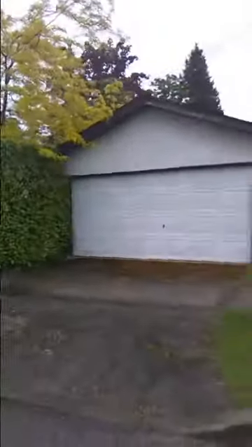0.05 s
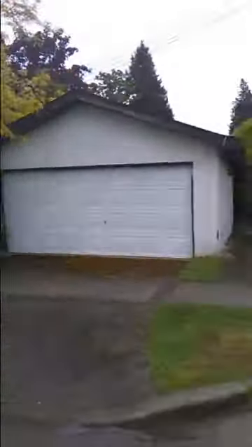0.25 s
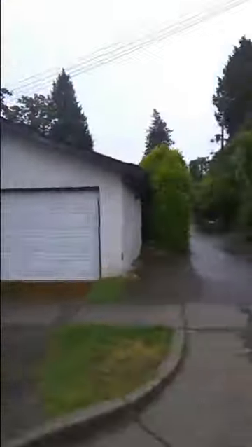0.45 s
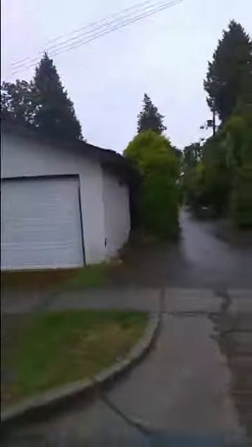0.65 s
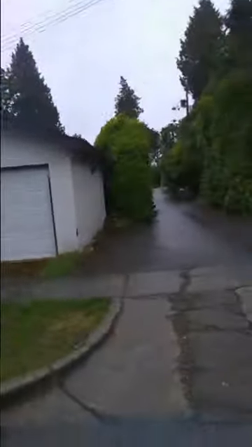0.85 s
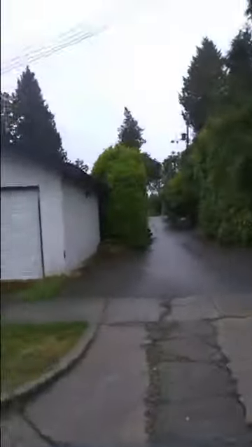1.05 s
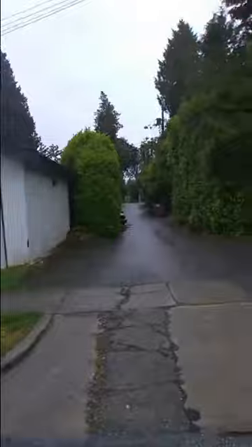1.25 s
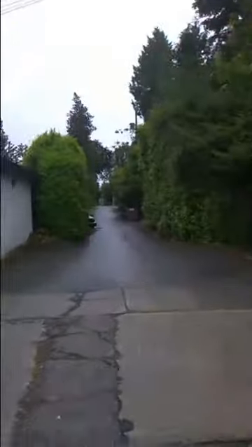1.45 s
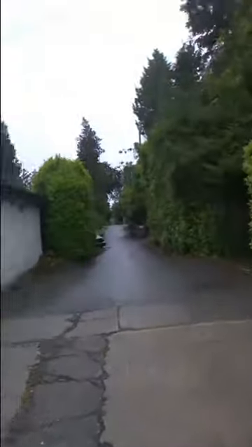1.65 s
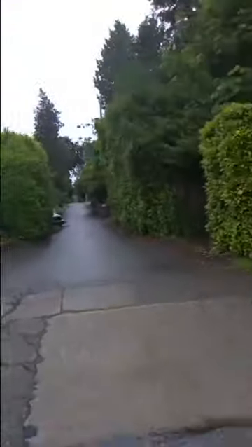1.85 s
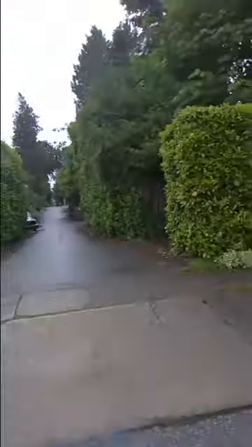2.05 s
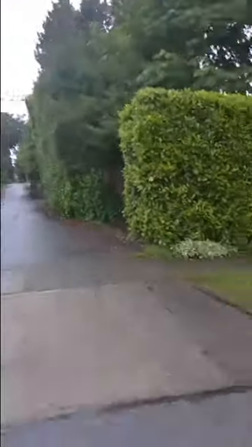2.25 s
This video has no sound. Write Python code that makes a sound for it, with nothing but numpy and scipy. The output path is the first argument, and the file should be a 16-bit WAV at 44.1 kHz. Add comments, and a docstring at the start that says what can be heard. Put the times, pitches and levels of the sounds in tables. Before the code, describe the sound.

Gusts of wind hit the microphone with uneven low thumps, ease off, then return more briefly. Beneath them, soft footsteps scuff and fizz on wet outdoor pavement, and very faint distant traffic swells near the end.

```python
"""A hand-held camera moves along a damp lane. Over quiet outdoor air come short wet scuffs, probably
soles on the pavement, each a snap and a fizz of spray, with ticks of grit between them. From 0.2 to
0.9 s turbulent gusts buffet the two microphone ports, the left one hard enough to overload.
After a lull the scuffs return and far traffic swells; more gusts peak near 1.8 s, and two last
scuffs sound as the wind dies away."""
import sys
import numpy as np
from scipy import signal
from scipy.fft import rfft, irfft, next_fast_len
from scipy.io import wavfile
from scipy.ndimage import uniform_filter1d

SR = 44100
rng = np.random.default_rng(int(sys.argv[2]) if len(sys.argv) > 2 else 0)


def materialize(psi):
    """Save the field psi as 16-bit PCM at rate SR to the path in sys.argv[1].

    A 1-D psi becomes a single channel; in a 2-D psi each row is a channel.
    """
    bounded = np.clip(np.atleast_2d(psi).T, -1, 1)
    quanta = np.round(bounded * 32767).astype(np.int16)
    wavfile.write(sys.argv[1], SR, quanta)


N = 101429
TIME = np.arange(N) / SR

# Bright spectrum of snapping grit: frequency_hz, gain_db
GRIT_SPECTRUM = [(2000, -22.5), (4500, -30), (6500, 4), (7600, -4), (8800, 7.5), (10500, -9),
                 (14000, -11.5), (16000, -48)]
GRIT_RISE = 0.29  # rise time as a share of the fall time


def amp(db):
    """Amplitude grows tenfold for every 20 dB."""
    return 10 ** (np.asarray(db) / 20)


def unit_rms(x):
    """Normalisation to unit mean power."""
    return x / np.sqrt(np.mean(x ** 2) + 1e-20)


def ports(pan_db):
    """A level difference between the ports gives direction; positive is left."""
    return amp([[pan_db / 2], [-pan_db / 2]])


def coloured(x, spectrum, ratio=1):
    """Spectral shaping: x is filtered by a curve transposed by ratio, then set to rms 1."""
    hz, db = np.transpose(spectrum)
    length = x.shape[-1]
    size = next_fast_len(length)
    bins_hz = np.fft.rfftfreq(size, 1 / SR)
    gain = amp(np.interp(np.log(bins_hz + 1), np.log(hz * ratio + 1), db))
    return unit_rms(irfft(rfft(x, size) * gain, size)[..., :length])


def noise(spectrum, correlation, ratio=1, grain_db=0., count=N):
    """Partly coherent stereo noise; uneven grains roughen it, and it repeats after count samples."""
    left, independent = rng.standard_normal((2, count))
    right = correlation * left + np.sqrt(1 - correlation ** 2) * independent
    grains = amp(grain_db * np.minimum(rng.exponential(1, count), 5))
    stretch = coloured(np.array([left, right]) * grains, spectrum, ratio)
    return np.tile(stretch, N // count + 1)[:, :N]


def burst(peak_s, rise_s, fall_s):
    """Envelope of a transient: Gaussian rise, exponential decay."""
    t = TIME - peak_s
    return np.exp(-np.minimum(np.where(t < 0, (t / rise_s) ** 2, t / fall_s), 60))


def background():
    """Incoherent sources add in power: distant tyre noise swells over a steady ambient floor."""
    # Traffic swell: time_s, level_db
    swell = [(0, -66.5), (.9, -68), (1.1, -66.5), (1.25, -60), (1.7, -55), (1.95, -51.5), (2.1, -51.5),
             (2.3, -54.5)]
    # Spectra of tyres and outdoor air: frequency_hz, gain_db
    tyre_spectrum = [(100, 7), (300, -11), (600, 0), (900, 3), (1250, 4), (1600, -1.5), (2100, -13),
                     (3500, -15.5), (6000, -31), (12000, -37)]
    air_spectrum = [(30, -11), (80, 10), (250, 10), (600, 3.5), (1400, 0.5), (2400, 3.5), (4500, -5.5),
                    (8500, -2.5), (11000, -11), (15000, -22)]
    traffic = amp(np.interp(TIME, *np.transpose(swell))) * noise(tyre_spectrum, correlation=0.68)
    air = amp(-68.5) * noise(air_spectrum, correlation=0.1)
    return ports(pan_db=2) * traffic + ports(pan_db=1) * air


def ticks():
    """A brief impulse has a broad spectrum: single grains of grit snap, mostly on the left."""
    # Snaps: peak_s, level_db
    snaps = [(.113, -47), (0.211, -62), (.482, -65), (0.594, -61.5), (.617, -61), (0.628, -63),
             (0.904, -65), (1.421, -67), (1.561, -58), (1.687, -58), (1.719, -55), (1.801, -52.5)]
    fall_s = 0.0012
    envelope = sum(amp(db) * burst(at, GRIT_RISE * fall_s, fall_s) for at, db in snaps)
    return ports(pan_db=13) * noise(GRIT_SPECTRUM, correlation=0.2) * envelope


def sprays():
    """Many fine droplets merge into a hiss, after the scuffs and faintly between them."""
    # Showers of droplets: peak_s, level_db, rise_s, fall_s, pan_db, pitch_ratio
    showers = [(.082, -46.5, 0.025, 0.038, 3, 0.99), (.13, -54.5, 0.017, 0.028, 7.5, 1.07),
               (.252, -64, .004, 0.025, -10, 0.75), (0.316, -56.5, 0.024, 0.045, 6, 0.9),
               (.56, -68.5, .015, .03, 10, 1), (.63, -65, 0.018, 0.073, 7, 0.82),
               (1.177, -50.5, 0.032, 0.04, 3.5, 0.94), (1.361, -61, 0.031, 0.12, 2, 0.68),
               (1.425, -63, 0.023, 0.027, 3, 0.86), (1.55, -46.5, 0.021, 0.044, 4.5, 0.98),
               (1.688, -62, 0.027, 0.017, 21, 1.27), (1.73, -61, 0.15, 0.073, -6, 0.81),
               (1.94, -67, 0.036, 0.063, -14, 0.82), (2.171, -54.5, 0.075, 0.063, -7, 0.92),
               (2.249, -45.5, 0.067, 0.052, -0.5, 0.96)]
    # Droplet spectrum: frequency_hz, gain_db
    spectrum = [(1500, -21), (2700, -11.5), (4500, -10), (5400, -4.5), (7000, -4), (8700, 5), (10200, -3.5),
                (14000, -22), (16000, -40)]
    out = np.zeros((2, N))
    for at, db, rise_s, fall_s, pan_db, ratio in showers:
        fizz = noise(spectrum, correlation=0.042, ratio=ratio, grain_db=2.5, count=16384)
        out += ports(pan_db) * amp(db) * burst(at, rise_s, fall_s) * fizz
    return out


def scuffs():
    """Friction on wet grit gives bursts of noise: a bright top over a duller, pitched body."""
    # Crunches: peak_s, level_db, fall_s, body_relative_db, pitch_hz, pan_db
    crunches = [(0.0391, -36, 0.0039, -11, 2200, 11), (0.0503, -42.5, 0.0023, -29, 2600, -2),
                (0.0792, -41, 0.0072, -7, 3100, 12), (0.288, -48.5, 0.0069, 3, 3260, 5),
                (1.14, -46, 0.0012, -17, 3800, 15), (1.1443, -36, 0.0043, -6, 3950, 8.5),
                (1.35, -70.5, 0.012, 9.5, 3270, 12), (1.523, -41, 0.0084, -1.5, 2560, 10),
                (1.551, -45, 0.0017, -7.5, 3540, 9), (1.664, -57.5, 0.016, -6, 3330, 23),
                (2.202, -37, 0.01, -13, 3520, 9), (2.254, -39, 0.0063, -33, 5000, 1)]
    # Spectrum of the body: pitch_multiple, gain_db
    body_spectrum = [(.3, -32), (.7, -12), (.88, -1), (1, 2.5), (1.25, -4), (1.7, -2), (2.6, -11.5),
                     (5, -25.5)]
    top = noise(GRIT_SPECTRUM, correlation=0.093, grain_db=3.5)
    out = np.zeros((2, N))
    for at, db, fall_s, body_db, pitch_hz, pan_db in crunches:
        body = noise(body_spectrum, correlation=0.14, ratio=pitch_hz, grain_db=3.5, count=4096)
        envelope = amp(db) * burst(at, GRIT_RISE * fall_s, fall_s)
        out += ports(pan_db) * envelope * (top + amp(body_db) * body)
    return out


def flutter():
    """Small eddies form an irregular pulse train, each pulse filtered to a soft pop."""
    # Spectrum of a pop: frequency_hz, gain_db
    spectrum = [(90, -25.5), (200, 1.5), (300, -3.5), (450, -6.5), (650, -12.5), (900, -29.5),
                (1300, -51.5), (4000, -115)]
    drift = unit_rms(uniform_filter1d(rng.standard_normal(N), size=200))
    eddies_per_s = 130 * abs(1 + 0.77 * drift)
    passed = np.floor(np.cumsum(eddies_per_s) / SR)
    pulses = np.diff(passed, prepend=passed[0]) * rng.choice([-1, 1], N)
    return coloured(pulses * amp(4 * rng.uniform(-1, 1, N)), spectrum)


def rumble(steady_s):
    """Turbulent pressure is low-frequency noise, here levelled over spans longer than steady_s."""
    # Turbulence spectrum: frequency_hz, gain_db
    spectrum = [(15, -37), (30, -33), (50, 0), (72, 3), (110, -5), (180, -10.5), (270, -20.5), (420, -53.5),
                (800, -105)]
    pressure = coloured(rng.standard_normal(N), spectrum)
    power = uniform_filter1d(abs(signal.hilbert(pressure)) ** 2, int(steady_s * SR))
    return unit_rms(pressure / np.sqrt(abs(power) + 1e-6))


def wind():
    """Turbulence is local, so each port has its own independent rumble and flutter."""
    # Gusts at each port, before the trims below: time_s, rumble_db, flutter_db
    left_gusts = [(0, -91, -81), (.03, -56.5, -68), (.11, -57.5, -68), (.135, -39, -74), (.19, -41, -55),
                  (.225, -17, -33), (.245, -32.5, -45), (.32, -24.5, -57), (.345, -20, -10.5),
                  (.41, -17, -25), (.435, -39, -44.5), (.51, -20.5, -30.5), (.57, -17, -39.5),
                  (.6, -26.5, -22), (.625, -35, -59.5), (.685, -20.5, -27), (.73, -15.5, -24),
                  (.77, -36.5, -53), (.835, -19, -37), (.86, -44.5, -53.5), (.89, -34, -50),
                  (.93, -52, -74), (1.1, -54.5, -68), (1.42, -58.5, -65.5), (1.48, -25.5, -38.5),
                  (1.54, -46.5, -54), (1.63, -62, -74), (1.7, -36, -34), (1.75, -31, -66),
                  (1.83, -16.5, -40), (1.915, -21.5, -33), (1.96, -40.5, -85.5), (2.1, -61, -57),
                  (2.3, -66, -84)]
    right_gusts = [(0, -84, -86), (.04, -55, -60.5), (.15, -66, -78), (.22, -30.5, -55), (.34, -34, -51.5),
                   (.37, -45, -64), (.57, -47, -73), (.625, -29.5, -60.5), (.74, -44, -66), (.81, -69, -83),
                   (.9, -40.5, -66), (1.0, -51, -80), (1.17, -51, -45), (1.28, -54, -69), (1.39, -36, -60),
                   (1.49, -52.5, -55), (1.61, -32.5, -68), (1.7, -39, -41), (1.78, -49, -68),
                   (1.85, -29, -62), (1.91, -47, -87), (2.04, -28, -49), (2.1, -47, -48),
                   (2.23, -54, -55.5), (2.3, -53.5, -69)]
    channels = []
    for gusts, rumble_trim_db, flutter_trim_db in (left_gusts, 1.5, -1.5), (right_gusts, 2, -7):
        time_s, rumble_db, flutter_db = np.transpose(gusts)
        deep = amp(np.interp(TIME, time_s, rumble_db) + rumble_trim_db) * rumble(steady_s=.02)
        fast = amp(np.interp(TIME, time_s, flutter_db) + flutter_trim_db) * flutter()
        channels.append(deep + fast)
    return np.array(channels)


def buffets():
    """An eddy striking a port is a rounded pressure step with a heavily damped back-swing."""
    # Single eddies: time_s, port, level_db, pressure_sign, edge_ms, swing_hz
    eddies = [(.1872, "L", -23.5, 1, 0.61, 134), (.2093, "L", -15.5, 1, 0.46, 140.4),
              (.2157, "L", -6, 1, 2.05, 142.4), (0.2211, "L", -7, 1, 0.83, 139),
              (0.2268, "L", -10.5, 1, 0.69, 126), (.3424, "L", -6.5, 1, 0.55, 293),
              (0.3523, "L", -2, 1, 0.5, 124), (0.3612, "L", 1.5, 1, 0.41, 113),
              (0.3764, "L", -18, 1, 0.17, 190), (.389, "L", 2, 1, .42, 148.6),
              (0.4932, "L", -19.5, 1, 0.73, 125.4), (0.5102, "L", -11.5, 1, 0.45, 108),
              (0.5537, "L", -13, -1, 0.8, 69.4), (0.6044, "L", -6.5, -1, 0.71, 204),
              (0.646, "L", -25, 1, 0.56, 150), (0.675, "L", -4, 1, 0.48, 100), (0.6829, "L", -6, 1, 2, 70),
              (0.7074, "L", -28, 1, 0.37, 130), (.717, "L", -2.5, 1, 0.44, 214),
              (0.7211, "L", -7, 1, 0.67, 89.5), (0.7851, "L", -16.5, -1, 1.4, 111),
              (.875, "L", -23.5, -1, 1.27, 180), (1.039, "L", -34.5, 1, 1.8, 270),
              (1.327, "R", -24, 1, 3.6, 214), (1.382, "R", -22, 1, 2.6, 130),
              (1.462, "L", -26, 1, 1.3, 196), (1.789, "L", -8, -1, 3, 142), (1.808, "L", -20, 1, 0.64, 200),
              (1.821, "L", -11, -1, 0.61, 120), (1.84, "L", -1, -1, 4.5, 75),
              (1.875, "L", -18, 1, 0.48, 190), (1.902, "L", -9.5, -1, 1.7, 100),
              (1.9187, "L", -7, 1, 2.4, 166), (2.029, "R", -18.5, 1, 2.4, 222.1),
              (2.122, "R", -30.5, 1, 0.57, 197)]
    lead_s, tail_s = 0.00098, 0.0021
    out = np.zeros((2, N))
    for at, port, db, sign, edge_ms, swing_hz in eddies:
        near = abs(TIME - at) < .03
        t = TIME[near] - at
        slope = np.exp(-np.minimum((1000 * t / edge_ms) ** 2, 50))
        step = 2 * np.cumsum(slope) / slope.sum() - 1
        swing = np.cos(2 * np.pi * swing_hz * t)
        fade = 2 * np.exp(-np.logaddexp(-t / lead_s, t / tail_s))
        out["LR".index(port), near] += sign * amp(db) * step * swing * fade
    return out


def scene():
    """Superposition: wind pressure and the sounds of the lane add at each port."""
    return wind() + buffets() + scuffs() + sprays() + ticks() + background()


def record(dry):
    """Overload clips the strongest buffets; a low-pass filter then limits the bandwidth."""
    overload, cutoff_hz = .83, 15000
    clipped = np.clip(dry, -overload, overload)
    low_pass = signal.firwin(255, cutoff_hz, window=("kaiser", 9), fs=SR)
    return signal.oaconvolve(clipped, low_pass[None], "same")


dry = scene()
out = record(dry)
materialize(out)
```